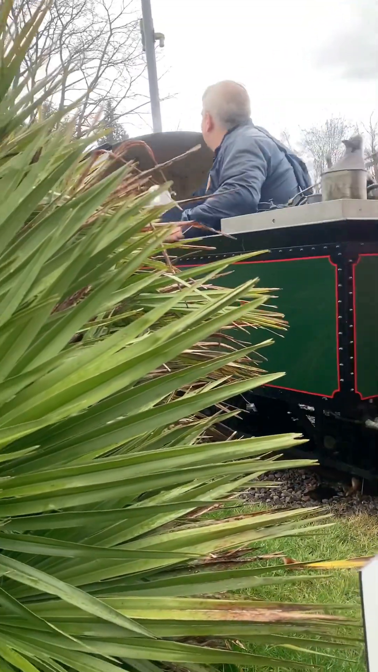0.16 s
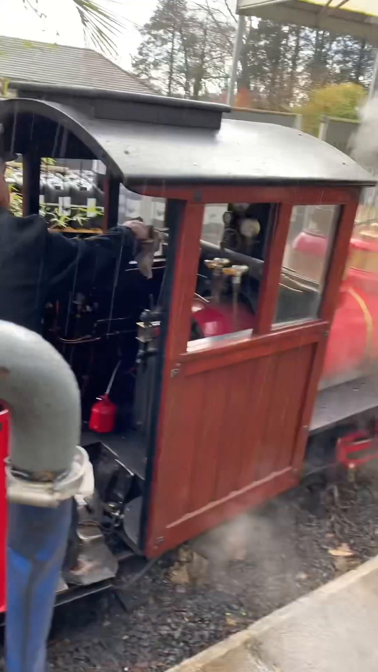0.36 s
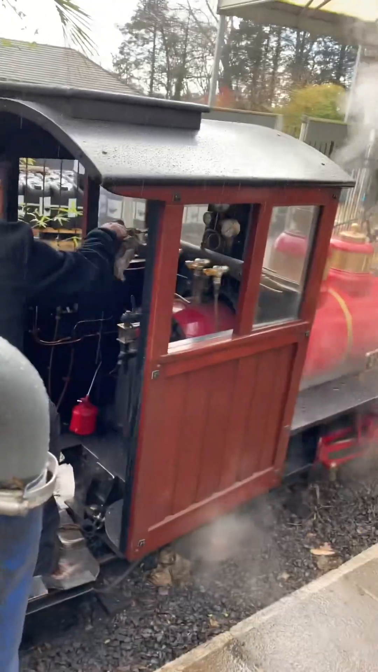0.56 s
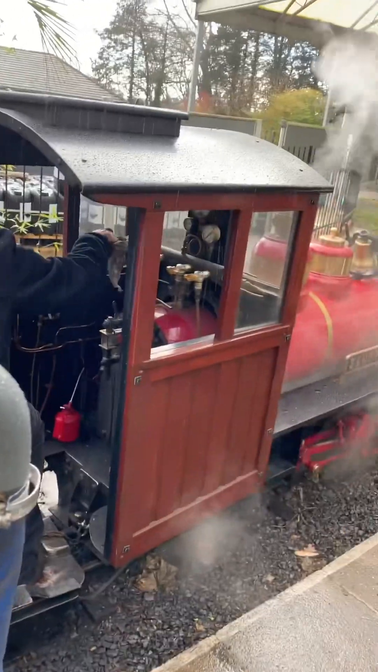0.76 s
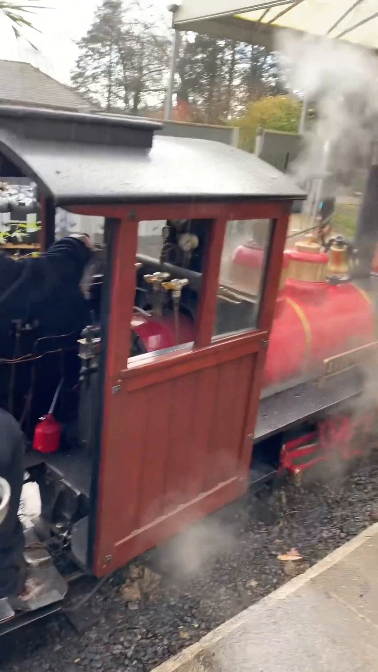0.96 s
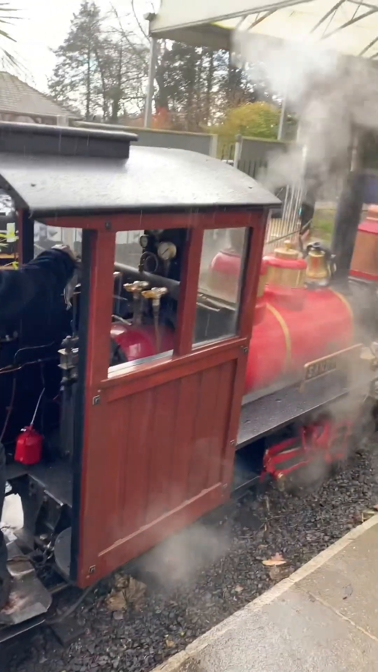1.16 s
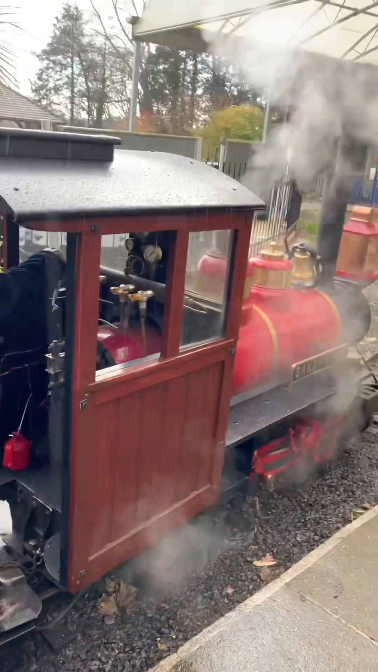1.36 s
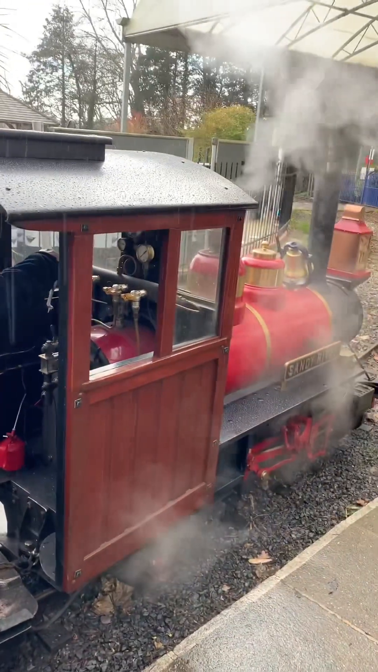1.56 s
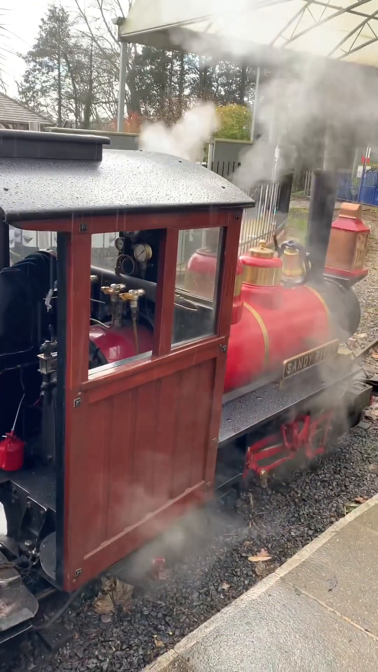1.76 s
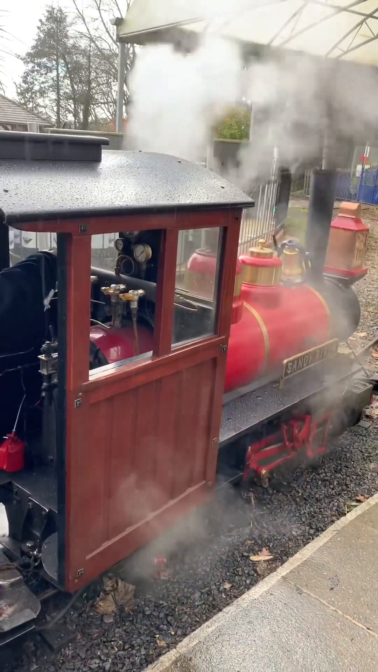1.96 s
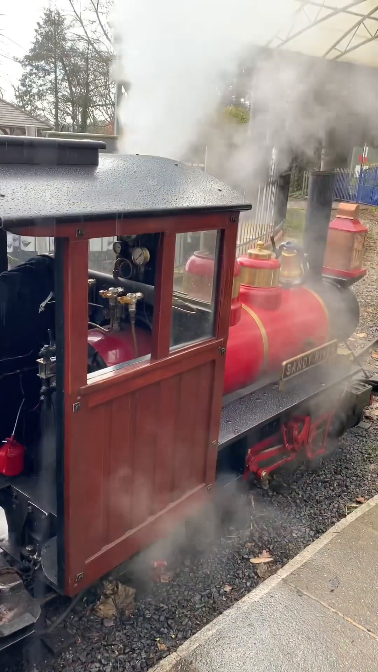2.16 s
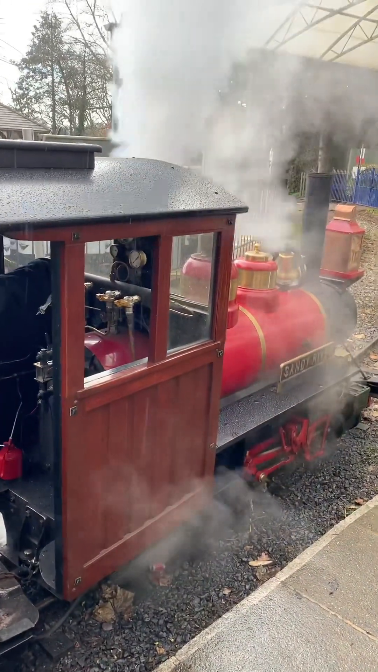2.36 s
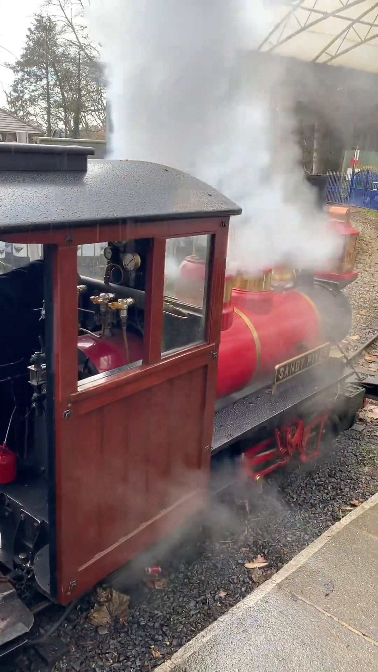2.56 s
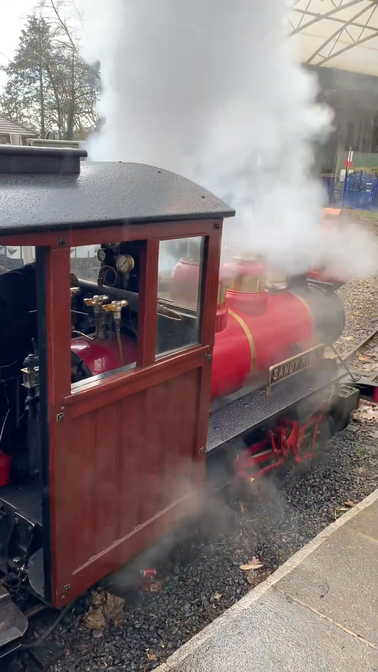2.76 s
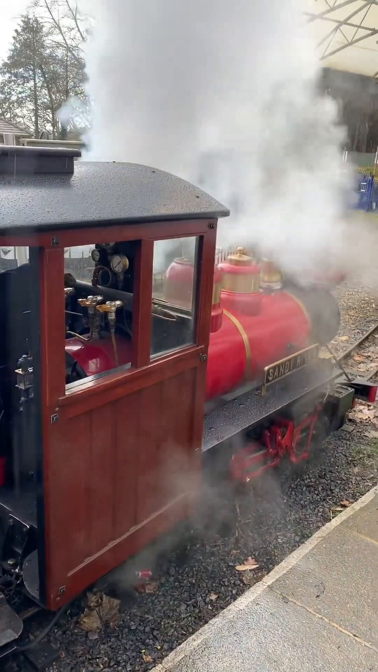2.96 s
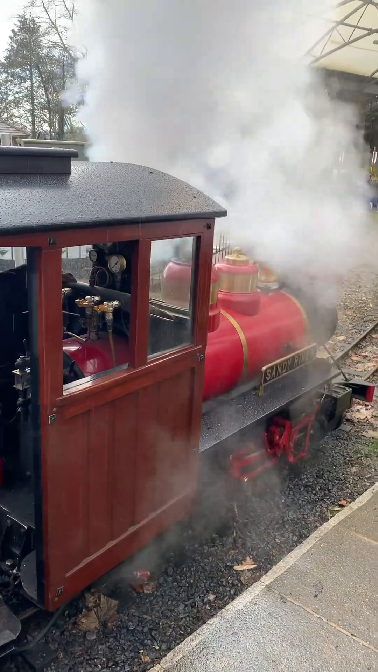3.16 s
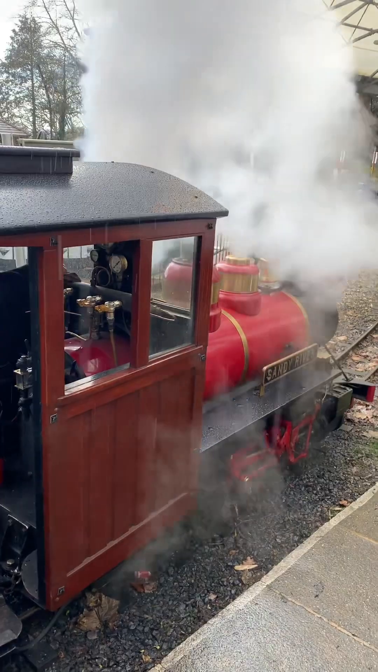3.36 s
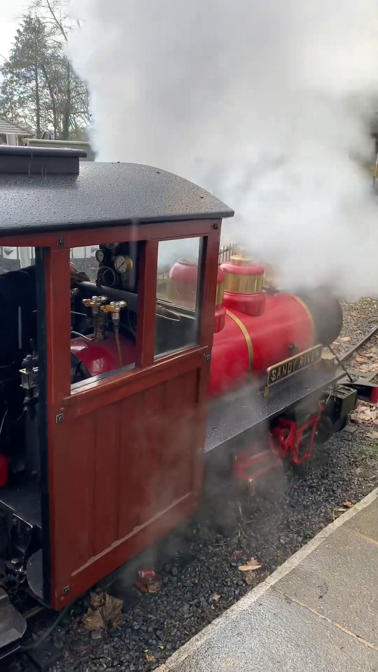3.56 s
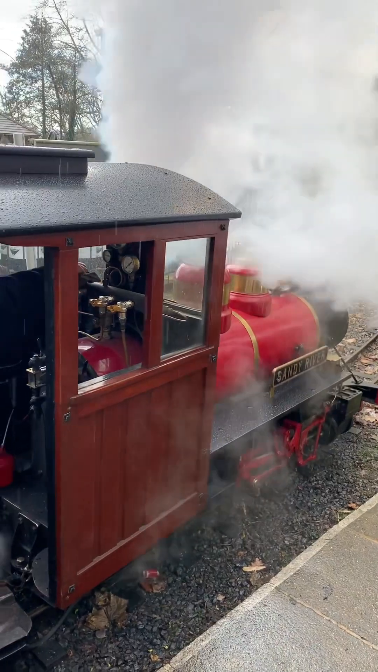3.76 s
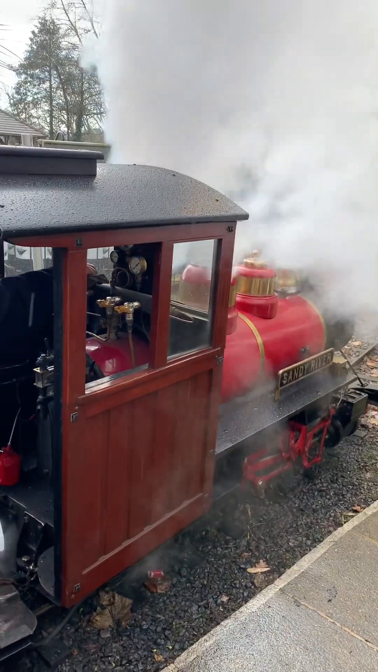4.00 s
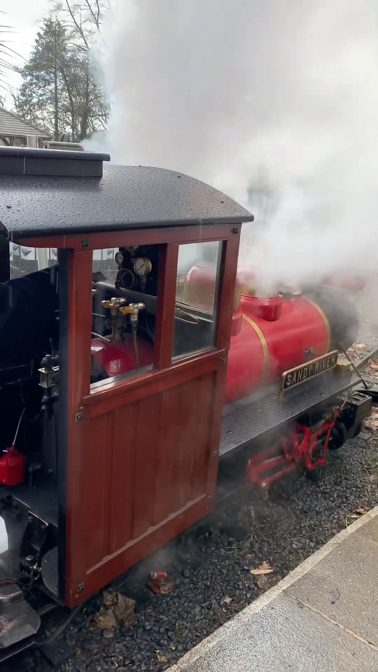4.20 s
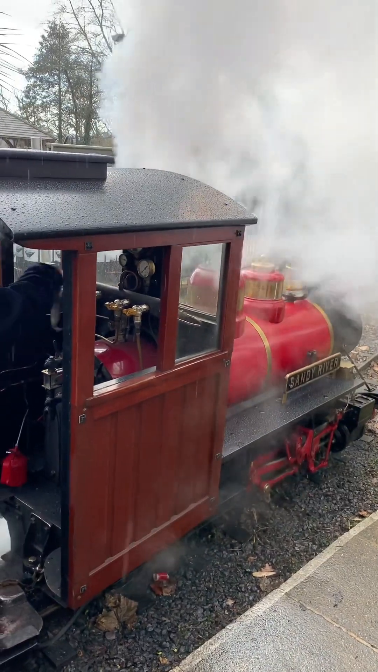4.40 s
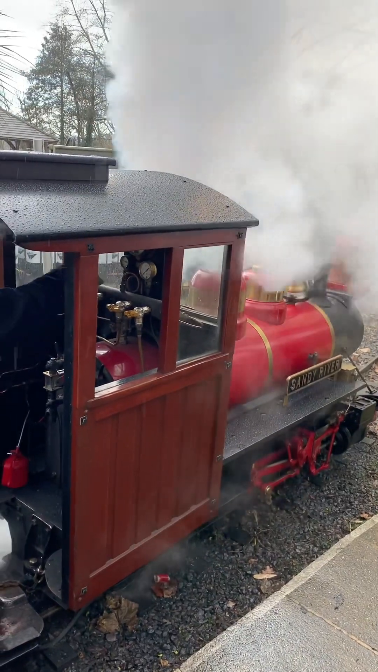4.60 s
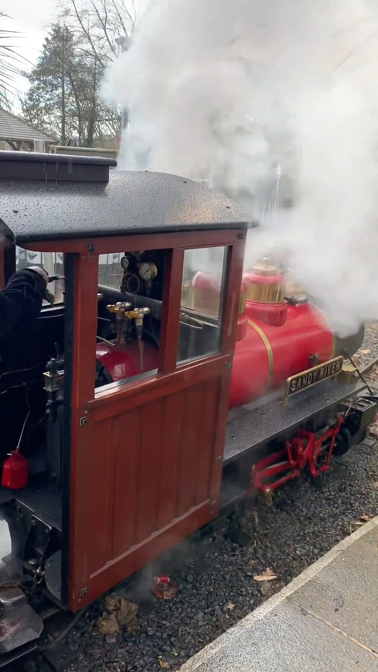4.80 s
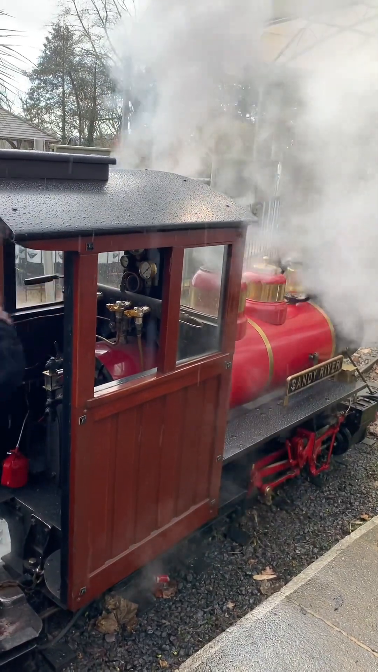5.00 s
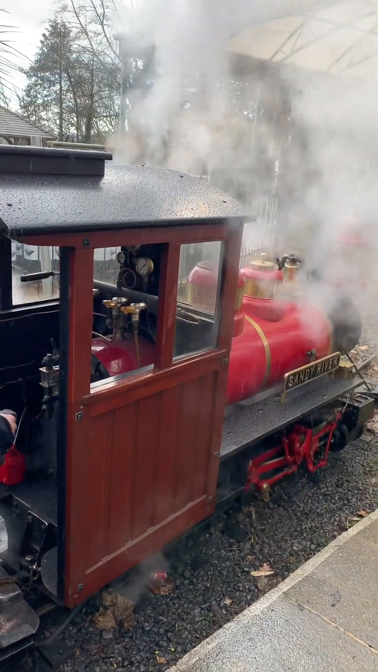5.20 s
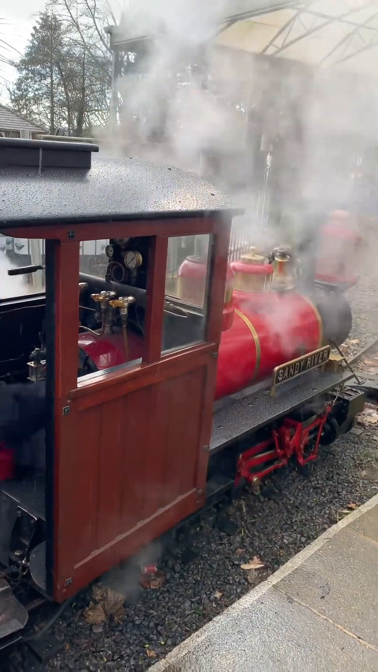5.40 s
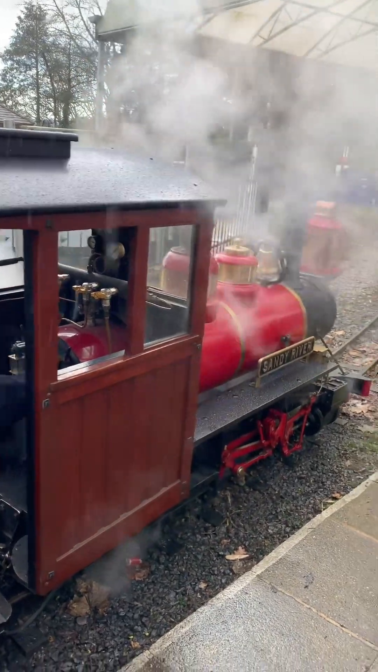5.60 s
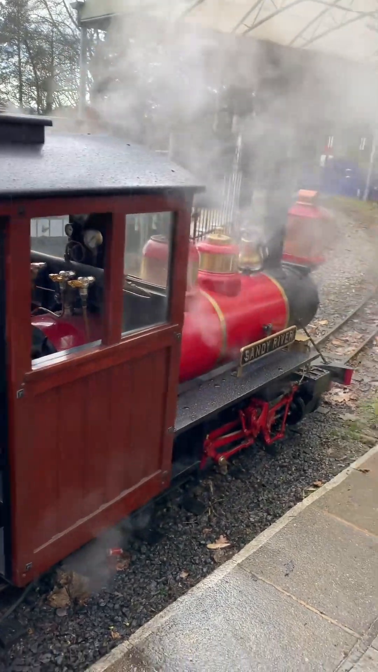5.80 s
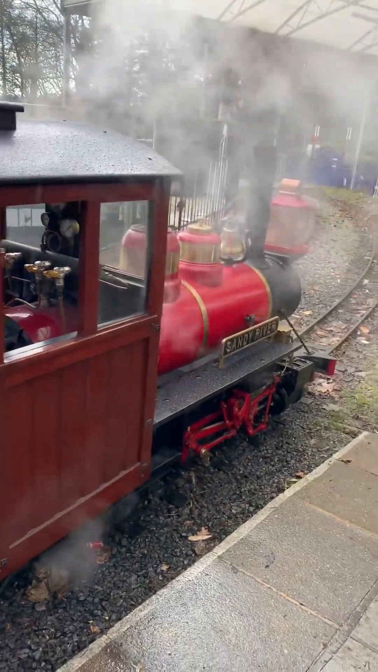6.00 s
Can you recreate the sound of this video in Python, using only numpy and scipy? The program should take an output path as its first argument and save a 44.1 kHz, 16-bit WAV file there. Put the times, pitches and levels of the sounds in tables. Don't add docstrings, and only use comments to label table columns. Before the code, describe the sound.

Lumpy low train rumble cuts to a leaking steam hiss, then wet gurgling sputters erupt into one long loud whistle tone and a short blast.

```python
import sys
import numpy as np
from scipy import signal
from scipy.fft import rfft, irfft, next_fast_len
from scipy.io import wavfile
from scipy.ndimage import uniform_filter1d, map_coordinates

SR = 44100
rng = np.random.default_rng(int(sys.argv[2]) if len(sys.argv) > 2 else 0)


def level_to_linear(level):
    exponent = np.asarray(level, float) / 20
    return 10 ** exponent


def wav_out(sig):
    wavfile.write(sys.argv[1], SR, np.round(np.clip(np.atleast_2d(sig).T, -1, 1) * 32767).astype(np.int16))


N = 266805

# full speech t/s, valve shuts t/s, shutting time/s
BLASTS = [
    (2.248, 2.249, 0.056),
    (2.408, 4.293, .072),
    (4.523, 4.654, 0.044),
]
# t/s, f/Hz, lowest partial level/dB, L-R level/dB
HOLD = [(2.26, 351.6, -7.5, -2.5), (2.41, 359.5, -9.5, -3), (2.46, 355, -1.5, -4.5),
        (2.58, 350.4, -0.5, -4), (2.9, 354.5, -8.5, -4), (3.28, 363.4, -8, -4), (3.52, 366.4, -14, 0),
        (4.2, 372.2, -14.5, -0.9), (4.66, 369.7, -15.5, -2)]
# level/dB, joins t/s, rise before that/(dB/s),
# steepness against the tone at its ends [ratio]
PARTIALS = [(-31, 2.6, 35.5, 1.3), (-23, 2.455, 400.5, 1.6), (-33.5, 2.89, 120.5, 1.5),
            (-33, 2.63, 89, 1.1), (-45, 3.0, 60.5, 1.4)]
# t/s, level/dB, half length/s
SHIFTS = [
    [],
    [(3.02, -7.5, 0.095), (3.55, 1.5, .2)],
    [(3.39, -6.5, 0.1)],
    [(2.98, 7, 0.15), (3.32, -9, .04)],
    [(3.328, -11, 0.049)],
]
# multiple of the pitch, level against the 4th/dB
HIGH_PARTIALS = [(7, -10.5), (8, -15.5), (9, -13.5), (10, -21.5), (12, -17.5), (13, -19.5), (15, -18)]
# t/s, drop/dB
SNATCH = [(2.264, -1.5), (2.421, 3.5), (2.454, 2), (2.474, 5), (2.523, 3.5), (2.593, 5), (2.727, 3.5),
          (3.067, 4.5), (3.288, 3.5)]
# t/s, level/dB, half length/s
GASP = (4.703, -29.5, 0.016)
JET_SPAN = [(1.7,), (5.0,)]
# f/Hz, level per Hz/dB
JET_COLOUR = [(60, -19.5), (120, -22), (250, 0), (550, -4), (900, 0), (1300, 0), (2000, 0), (2700, -3),
              (4000, 2), (6000, -2.5), (8000, -1.5), (12000, -2), (14000, -5), (15500, -8)]
# t/s, flow level/dB
FLOW = [(.78, -53.5), (1.15, -52), (1.37, -41), (1.6, -46), (2.0, -29), (2.2, -19), (2.29, -24.5),
        (2.41, -22), (2.5, -30.5)]
# f/Hz, width/Hz, level at reference flow/dB, growth with flow/(dB/dB)
PIPE = [(789, 150, -48, .5), (1121, 70, -47, .8), (1550, 130, -49, 0.53), (2466, 75, -64, .3),
        (976, 25, -69.5, .5), (204, 170, -50, 0.16)]
# t/s, peak level/dB, decay/s
MODE_FLARES = [
    [(.82, -42, 0.1), (1.43, -38.5, 0.093), (1.495, -32.5, .08), (1.865, -35.5, .03), (1.96, -24.5, .04),
     (2.02, -19, 0.071), (2.13, -20.5, .04)],
    [(.82, -48.5, 0.13), (1.22, -38, 0.29), (1.49, -41, 0.18)],
    [(1.86, -39, 0.036), (1.95, -32.5, .03), (2.01, -25, 0.032), (2.06, -24.5, 0.045), (2.12, -29, .05),
     (2.17, -31, .02)],
    [(1.36, -46, .4), (2.16, -29.5, .03)],
    [(1.25, -48.5, .1)],
    [(2.25, -33.5, .03), (2.395, -19.5, .03)],
    [(.8, -51.5, 0.11), (1.2, -49, 0.12), (1.47, -42, .06), (1.69, -45, 0.055), (1.88, -40, .08),
     (2.04, -36, 0.03)],
]
# f/Hz, width/Hz, level/dB
UPPER_MODES = [(990, 120, 8), (1650, 120, 6.5), (1860, 140, 4), (2991, 150, 3.5), (3420, 560, 4)]
# f/Hz, level per Hz/dB
ROAR_COLOUR = [(120, -21.5), (250, 3.5), (550, -7), (800, 1), (1300, -0.5), (2000, 0.5), (3000, -4),
               (4500, -1.5), (6500, -11.5), (9000, -8), (12000, -34), (15500, -22.5)]
# delay t/s, level/dB
ECHOES = [(0.061, -29), (.1, -28.5), (.17, -27.5), (0.25, -42), (.33, -53), (0.399, -47.5), (.52, -58.5),
          (.7, -62.5)]
# f/Hz, time to fall 60 dB/s
YARD = [(200, 0.57), (2000, 0.84), (5000, .5), (12000, .3)]
# t/s, level/dB
KNOCK = (5.9937, -9.5)
# t/s, level/dB
DUCK = [(.35, -27), (2.4, -27.5), (2.6, -48.5), (3.6, -49.5), (4.2, -57), (5, -76.5), (5.5, -69.5),
        (6.05, -69)]
# f/Hz, level per Hz/dB
LEAK = [(30, -20), (60, 1.5), (120, -12), (250, -17.5), (500, -26), (900, -22), (1500, -24), (2500, -34.5),
        (3500, -22), (5000, -17.5), (7000, -15), (10000, -13.5), (12500, -13.5), (15500, -13)]
# f/Hz, width/Hz, level/dB
LEAK_RINGS = [(59, 12, -0.5), (2870, 200, -1.5), (3480, 360, 3.5), (6870, 290, 6.5), (8240, 300, 6),
              (10380, 300, 5), (12100, 710, 6), (14950, 200, 5.5)]
# f/Hz, level per Hz/dB
AIR = [(30, -14), (60, 3), (120, -4), (250, -4.5), (500, -8.5), (900, -12.5), (1500, -13), (2500, -24),
       (3500, -17), (5000, -18.5), (7000, -12.5), (10000, -12), (12500, -10.5), (15500, -18)]
# t/s, level/dB
RUMBLE = [
    (0.0, -30),
    (0.35, -32.5),
]
# f/Hz, level per Hz/dB
TRAIN = [(30, -24.5), (55, 3), (120, 2), (250, -1.5), (450, -20.5), (850, -19), (1500, -23.5), (2500, -31),
         (4000, -22), (5500, -27.5), (7000, -32.5), (10000, -30), (13000, -27.5), (15500, -36.5)]
# f/Hz, level/dB
APART = [(100, -37.5), (400, 3), (900, 0.5), (2500, 3), (3700, -14.5), (4300, -30.5), (16000, -35.5)]
# f/Hz, phase/rad
PORT_LEAD = [(0, 0), (400, -.2), (1000, -.4), (1700, .2), (2500, 1.1), (3300, 1.7), (3900, 2.2),
             (4250, 2.5), (4500, 2.95)]
# f/Hz, L-R level/dB
PORT_BALANCE = [(100, 0.5), (370, 0.6), (740, -3.5), (1100, 0.6), (1600, -2.5), (2400, -5), (3300, 0),
                (16000, -0.5)]

CUT_S = .352
FLOW_REF_DB, FLOW_FADE_S = -40, .11
LOW_HZ, LOW_HZ_PER_DB = 317.3, 1.5
LOW_DB, LOW_GROWS = -40, 0.76
FLARE_RISE_S = 0.03
TAKEOVER_S = 2.22
GROW_DB_PER_S, STALL_DB, SAG_HZ = 310.5, -16.5, 11
JET_DB, JET_DROOP_DB_PER_S, JET_OPEN_DB_PER_S, JET_SHUT_DB_PER_S = -36.5, 3, 330.5, 171
JET_LEAD_S = .015
JET_LEAK_DB = -19.5
JET_HELD = 0.28
SPRAY_DB, SPRAY_GROWS = -12.5, 1.3
BASS_HZ, BASS_REF_DB, BASS_SHARE = 680, -11, 0.77
EDGE_FROM_S, EDGE_TO_S, EDGE_FROM_HZ, EDGE_TO_HZ = 2.7, 3.6, 8800, 10150
EDGE_DB, EDGE_FULL_S, EDGE_DB_PER_S, EDGE_STEEP = -37, 2.9, 60, 3
PORT_TURN_HZ, PORT_ZERO_HZ = 4200, 2600


def whistle():
    t = np.arange(N) / SR
    valve = np.array([np.clip(1 - (t - shut) / shut_s, 1e-4, 1) for _, shut, shut_s in BLASTS])
    growth_db = GROW_DB_PER_S * np.minimum(t - np.array(BLASTS)[:, :1], 0)
    open_db = growth_db + 20 * np.log10(valve)
    locked_db = open_db[1:].max(0)
    pitch, tone_db, lean_db, _ = curves(HOLD)
    current_valve = valve[1:][open_db[1:].argmax(0), np.arange(N)]
    pitch = pitch - SAG_HZ * (1 - current_valve)
    turns = 2 * np.pi * np.cumsum(pitch * (1 + 0.0014 * wobble(40))) / SR
    held_db = sum(drop * np.exp(-np.abs(t - s) / 0.14) * np.clip((t - s) / 0.0039, 0, 1)
                  for s, drop in SNATCH)
    low_db = tone_db - held_db + open_db.max(0)
    tone = lowest_partial(turns, low_db, lean_db) + overtones(turns, locked_db)
    hiss = jet_hiss(turns, tone_db, held_db, locked_db)
    return np.sqrt(2) * tone, hiss + edge_tone(turns, locked_db)


def lowest_partial(turns, low_db, lean_db):
    stall = level_to_linear(STALL_DB + 2.2 * wobble(30)) * bump(2.325, 0.03)
    stall += level_to_linear(GASP[1]) * bump(GASP[0], GASP[2])
    low = np.maximum(level_to_linear(low_db + .5 * wobble(45)), stall) * np.sin(turns)
    return low * level_to_linear([lean_db / 2, -lean_db / 2])


def overtones(turns, locked_db):
    t = np.arange(N) / SR
    partial_db = []
    for (db, joins_s, rate, steep), shifts in zip(PARTIALS, SHIFTS):
        level_db = db + rate * np.minimum(t - joins_s, 0) + steep * locked_db
        partial_db.append(level_db + sum(by_db * bump(at, half) for at, by_db, half in shifts))
    unsteady = 1 + 1.1 * np.exp(-np.abs(t - BLASTS[1][0]) / .5)
    tone = np.zeros(N)
    for k, db in enumerate(partial_db):
        phase = (k + 2) * turns + .25 * wobble(60) + k
        tone += level_to_linear(db + 0.81 * unsteady * wobble(50)) * np.sin(phase)
    for multiple, db in HIGH_PARTIALS:
        phase = multiple * turns + .5 * wobble(60)
        tone += level_to_linear(partial_db[2] + db + 2.7 * wobble(30)) * np.sin(phase)
    return tone


def jet_hiss(turns, tone_db, held_db, locked_db):
    t = np.arange(N) / SR
    blasts_db = []
    for full, shut, _ in BLASTS[1:]:
        opening_db = np.minimum(JET_OPEN_DB_PER_S * (t - full + JET_LEAD_S), 0)
        blasts_db.append(opening_db - JET_SHUT_DB_PER_S * np.maximum(t - shut, 0))
    dry_db = np.max(blasts_db, 0)
    between = (t > BLASTS[1][1]) & (t < BLASTS[2][0])
    dry_db = np.where(between, np.maximum(dry_db, JET_LEAK_DB), dry_db)
    dry_db += JET_DB - JET_DROOP_DB_PER_S * (t - BLASTS[1][0]) - JET_HELD * held_db
    flow_db, wet = curves(FLOW, fade=FLOW_FADE_S)
    full_flow_db = FLOW[5][1]
    spray = wet * level_to_linear(full_flow_db + SPRAY_DB + SPRAY_GROWS * (flow_db - full_flow_db))
    colour = lambda hz: level_to_linear(along(JET_COLOUR, hz)) * humps([(590.0, 130, -10)], hz)
    jet = rush(JET_SPAN, colour, patchy_db=-1.85, apart_db=-3.5, streak_db=4.0)
    jet = jet * np.hypot(level_to_linear(dry_db), spray) * level_to_linear(12.5 + 0.87 * wobble(15))
    bass = filtered(jet, lambda hz: 1 / (1 + (hz / BASS_HZ) ** 8))
    jet = jet + bass * (level_to_linear(BASS_SHARE * (tone_db - BASS_REF_DB)) - 1)
    return jet * (1 + .08 * level_to_linear(locked_db) * np.sin(turns))


def edge_tone(turns, locked_db):
    t = np.arange(N) / SR
    edge_hz = np.interp(t, [EDGE_FROM_S, EDGE_TO_S], [EDGE_FROM_HZ, EDGE_TO_HZ])
    edge_db = EDGE_DB + EDGE_DB_PER_S * np.minimum(t - EDGE_FULL_S, 0)
    edge_db = edge_db + EDGE_STEEP * locked_db + 1.5 * wobble(1.6)
    edge = level_to_linear(edge_db) * narrow(edge_hz + 40 * wobble(8) + 480 * np.sin(turns), 100)
    return edge * (1 + .15 * np.sin(turns))


def breath():
    flow_db, gate = curves(FLOW, fade=FLOW_FADE_S)
    t, more_db = np.arange(N) / SR, flow_db - FLOW_REF_DB
    size = level_to_linear([LOW_DB + LOW_GROWS * more_db] + [db + grows * more_db for _, _, db, grows in PIPE])
    for mode, flares in enumerate(MODE_FLARES):
        for s, db, dies_s in flares:
            shape = np.where(t < s, ((s - t) / FLARE_RISE_S) ** 2, (t - s) / dies_s)
            size[mode] += level_to_linear(db) * np.exp(-shape)
    before_lock = np.clip((TAKEOVER_S - t) / 0.031, 0, 1)
    lowest = size[0] * narrow(LOW_HZ + LOW_HZ_PER_DB * more_db, 55)
    broad_gurgle = level_to_linear(-0.5) * size[-1] * narrow(520, 350)
    modes = before_lock * (lowest + broad_gurgle)
    modes += sum(a * narrow(hz, width_hz) for a, (hz, width_hz, _, _) in zip(size[1:], PIPE))
    colour = lambda hz: level_to_linear(along(ROAR_COLOUR, hz)) * humps(UPPER_MODES, hz)
    sputter = level_to_linear(flow_db + 3.0 + 1.7 * wobble(45))
    span = [(FLOW[0][0] - FLOW_FADE_S,), (FLOW[-1][0] + FLOW_FADE_S,)]
    roar = rush(span, colour, patchy_db=-0.5, apart_db=-10.5, streak_db=4.5)
    return gate * (modes + sputter * roar)


def yard(x):
    hz, t, z = signal.stft(rng.standard_normal((2, SR)), SR, nperseg=256)
    decay = level_to_linear(-60 * t / along(YARD, hz)[:, None])
    tail = signal.istft(z * decay, SR, nperseg=256)[1]
    tail = level_to_linear(-19.5) * tail / np.linalg.norm(tail[0])
    walls = np.zeros(tail.shape[1])
    walls[[round(s * SR) for s, db in ECHOES]] = level_to_linear([db for s, db in ECHOES])
    return signal.fftconvolve(x[None], tail + walls, axes=1)[:, :N]


def knock():
    x = np.zeros(N)
    x[round(KNOCK[0] * SR)] = level_to_linear(KNOCK[1])
    return filtered(x, lambda hz: 1 / (1 + 1j * hz / 750) ** 2 / (1 + (hz / 3600) ** 8))


def station():
    level_db, _ = curves(DUCK)
    fade_in = np.clip((np.arange(N) / SR - CUT_S) / 0.027, 0, 1)
    leak_colour = lambda hz: level_to_linear(along(LEAK, hz)) * humps(LEAK_RINGS, hz)
    hiss = rush(DUCK, leak_colour, patchy_db=2.0, apart_db=2, streak_db=3.0)
    air_colour = lambda hz: level_to_linear(along(AIR, hz))
    air = rush([(CUT_S,), (N / SR,)], air_colour, patchy_db=0.0, apart_db=-2, streak_db=5.0)
    return fade_in * (level_to_linear(level_db + .6 * wobble(5)) * hiss + level_to_linear(-65.5) * air)


def passing_train():
    level_db, _ = curves(RUMBLE)
    lumps = level_to_linear(level_db + 0.76 * wobble(40))
    colour = lambda hz: level_to_linear(along(TRAIN, hz))
    rumble = rush(RUMBLE, colour, patchy_db=3.5, apart_db=3.5, streak_db=3.5)
    return lumps * rumble * (np.arange(N) < CUT_S * SR)


def rush(rows, response, patchy_db, apart_db, streak_db):
    edges_s = np.array([rows[0][0] - .05, rows[-1][0] + .05])
    start, stop = np.clip(np.round(SR * edges_s), 0, N).astype(int)
    z = signal.stft(rng.standard_normal((3, stop - start)), nperseg=1024)[2]
    patches = uniform_filter1d(uniform_filter1d(rng.standard_normal(z.shape[1:]), 10, 0), 5, 1)
    streaks = uniform_filter1d(uniform_filter1d(rng.standard_normal(z.shape[1:]), 2, 0), 20, 1)
    hz = np.fft.rfftfreq(1024, 1 / SR)[:, None]
    treble = np.clip(hz / 4000, .2, 1)
    z = z * level_to_linear(treble * (patchy_db * unit(patches) + streak_db * unit(streaks)))
    z = z[0] + z[1:] * level_to_linear(along(APART, hz) + apart_db)
    noise = signal.istft(z, nperseg=1024)[1][:, :stop - start]
    return np.pad(unit(filtered(noise, response)), ((0, 0), (start, N - stop)))


def narrow(hz, width_hz):
    turns = 2 * np.pi * np.cumsum(hz * np.ones(N)) / SR
    return wobble(width_hz) * np.cos(turns) + wobble(width_hz) * np.sin(turns)


def humps(modes, hz):
    return level_to_linear(sum(db / (1 + (2 * (hz - c) / w) ** 2) for c, w, db in modes))


def filtered(x, response):
    m = next_fast_len(x.shape[-1] + 8192)
    return irfft(rfft(x, m) * response(np.fft.rfftfreq(m, 1 / SR)), m)[..., :x.shape[-1]]


def wobble(rate):
    coarse = np.arange(0, N + 32, 32)
    knots = rng.standard_normal(int(N * rate / SR) + 4)
    curve = map_coordinates(knots, [coarse * rate / SR])
    return np.interp(np.arange(N), coarse, curve)


def curves(rows, fade=0.012):
    s, *cols = np.transpose(rows)
    t = np.arange(N) / SR
    gate = np.clip(np.minimum(t - s[0], s[-1] - t) / fade + 1, 0, 1)
    return [np.interp(t, s, c) for c in cols] + [gate]


def bump(s, half_s):
    return np.exp(-((np.arange(N) / SR - s) / half_s) ** 2)


def along(points, hz):
    f, v = np.transpose(points)
    return np.interp(np.log(hz + 1), np.log(f + 1), v)


def unit(x):
    return x / np.sqrt(np.mean(x ** 2) + 1e-20)


def scene():
    tone, jet = whistle()
    smear = lambda hz: np.exp(-2j * np.pi * 1.382 * np.log((hz + 30) / 30))
    tone = filtered(tone, smear)
    blow = filtered(knock(), smear)
    echoes = yard(tone.mean(0) + 0.68 * jet[0])
    return tone + jet + breath() + echoes + blow + station() + passing_train()


def band_limit(x):
    return signal.sosfilt(signal.butter(12, 16860, fs=SR, output="sos"), x)


def record(dry):
    def lead(hz):
        treble_lead = 2 * np.pi * (hz - PORT_ZERO_HZ) / PORT_TURN_HZ
        return np.where(hz < 4500, np.interp(hz, *np.transpose(PORT_LEAD)), treble_lead)

    half = lambda hz: level_to_linear(along(PORT_BALANCE, hz) / 2) * np.exp(.5j * lead(hz))
    left, right = filtered(dry, lambda hz: np.array([half(hz), 1 / half(hz)]) * (hz < 15900))
    share = lambda hz: np.cos(lead(hz) / 2) ** 2
    slack = rng.standard_normal(800)
    slack_hz = np.linspace(0, SR / 2, len(slack))
    loose = lambda hz: np.exp(1.1j * np.interp(hz, slack_hz, slack) * (hz > 4300))
    keep_mid = lambda hz: np.where(hz < 4500, hz < 4260, share(hz) > .065)
    keep_side = lambda hz: ((share(hz) < .89) | (hz < 4300)) * (hz < 14700)
    pair = np.array([left + right, left - right]) / 2
    mid, side = filtered(pair, lambda hz: np.array([keep_mid(hz), keep_side(hz) * loose(hz)]))
    both = np.array([mid + side, mid - side])
    mix = both / (1 + np.abs(both / 0.92) ** 8) ** (1 / 8)
    return band_limit(mix)


dry = scene()
out = record(dry)
wav_out(out)
```